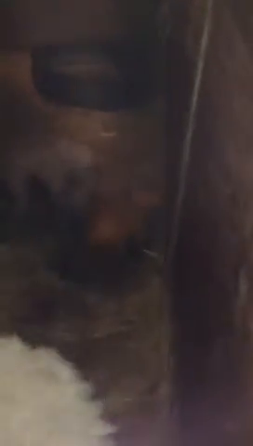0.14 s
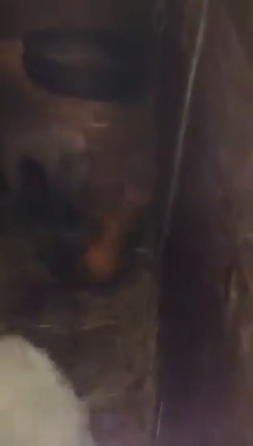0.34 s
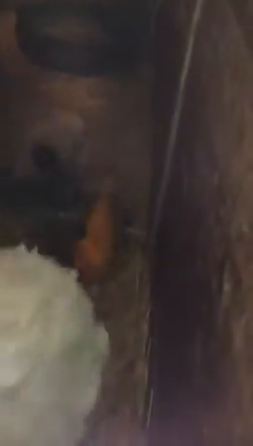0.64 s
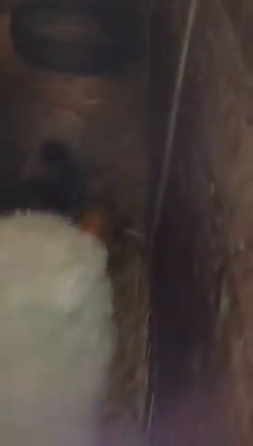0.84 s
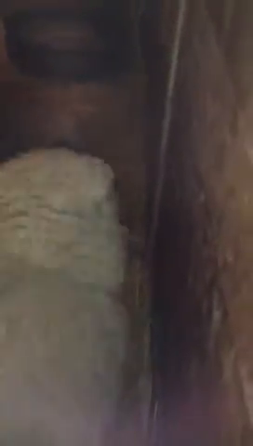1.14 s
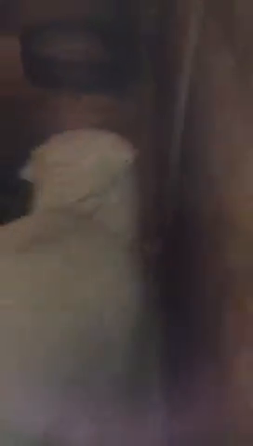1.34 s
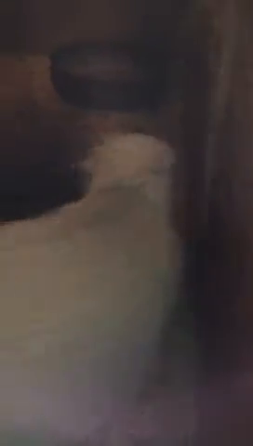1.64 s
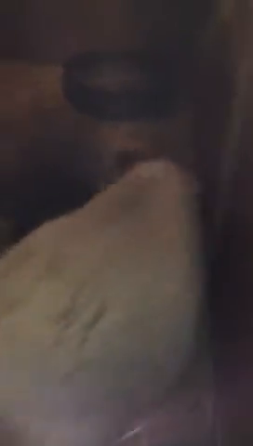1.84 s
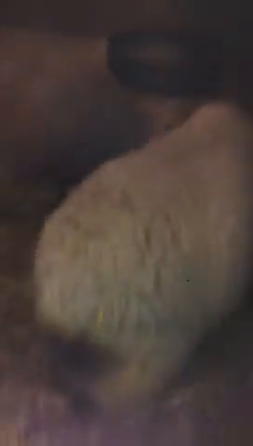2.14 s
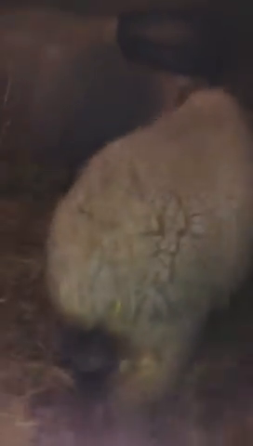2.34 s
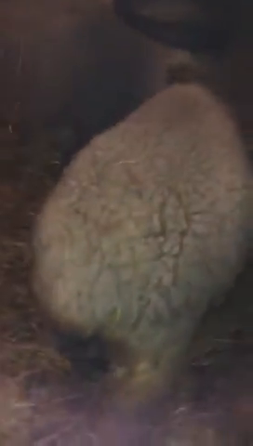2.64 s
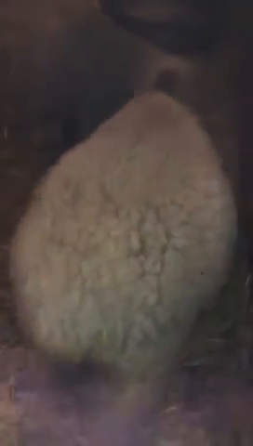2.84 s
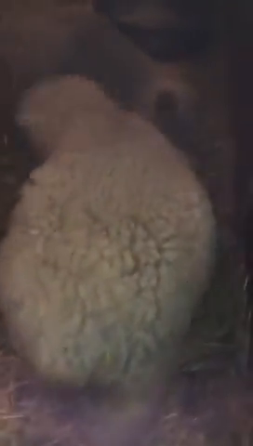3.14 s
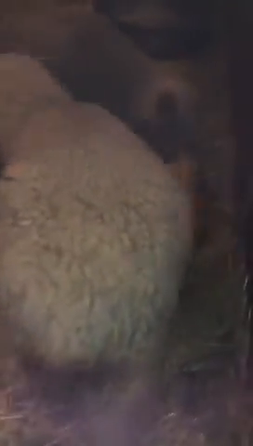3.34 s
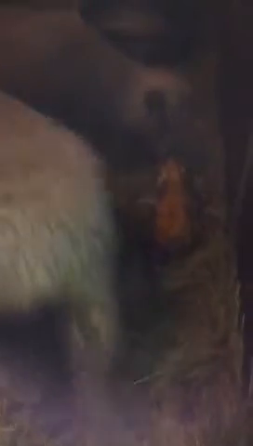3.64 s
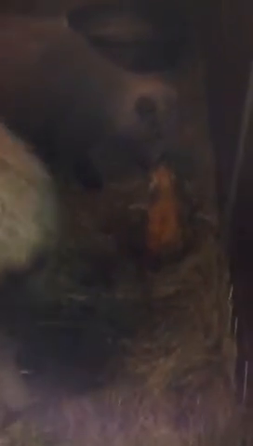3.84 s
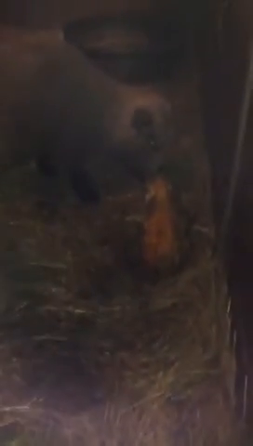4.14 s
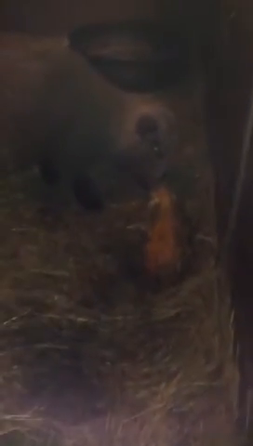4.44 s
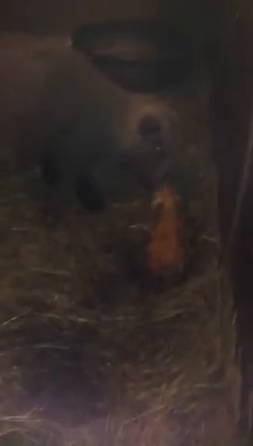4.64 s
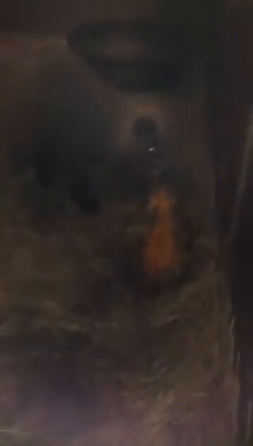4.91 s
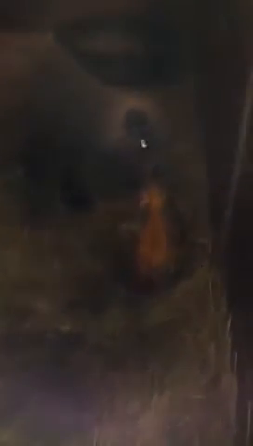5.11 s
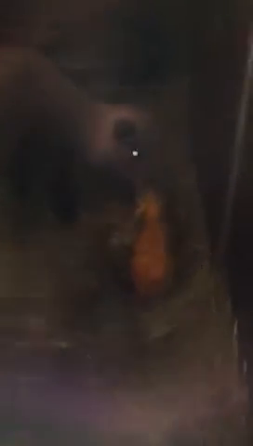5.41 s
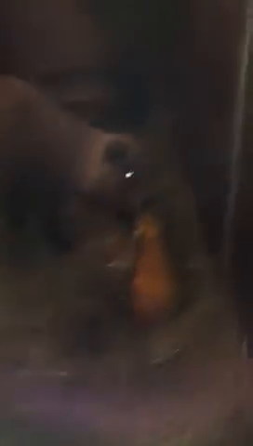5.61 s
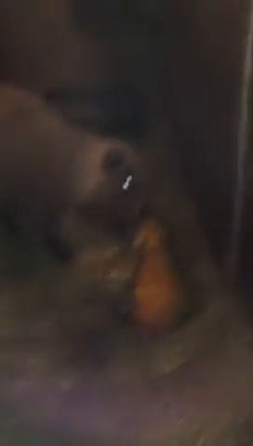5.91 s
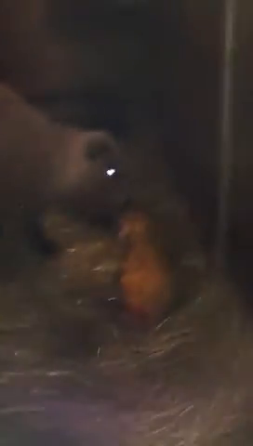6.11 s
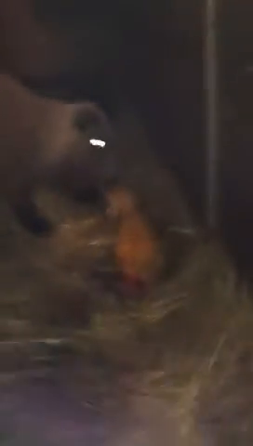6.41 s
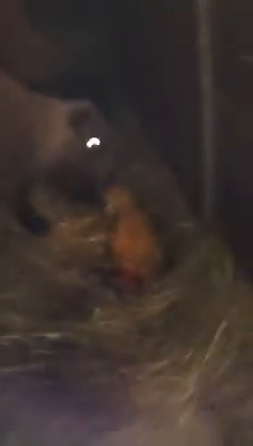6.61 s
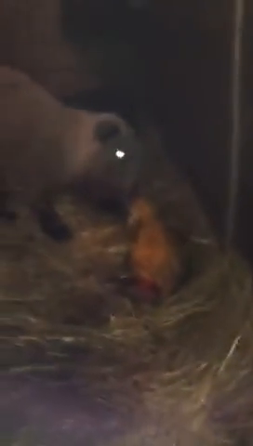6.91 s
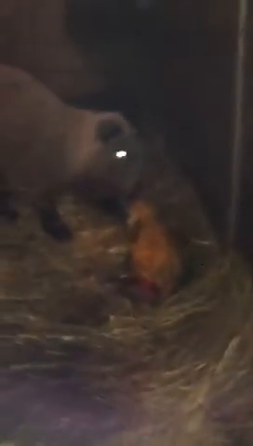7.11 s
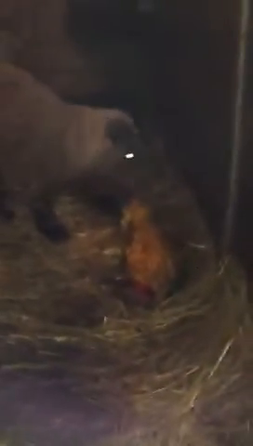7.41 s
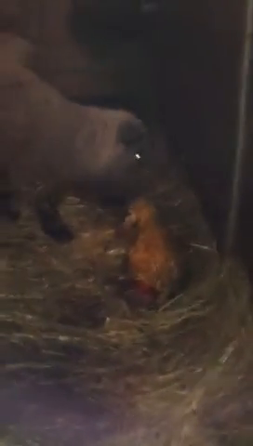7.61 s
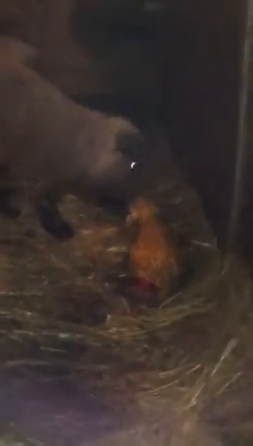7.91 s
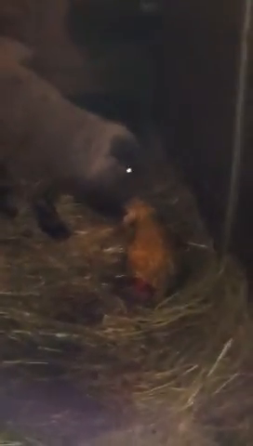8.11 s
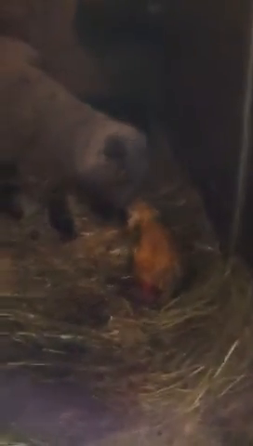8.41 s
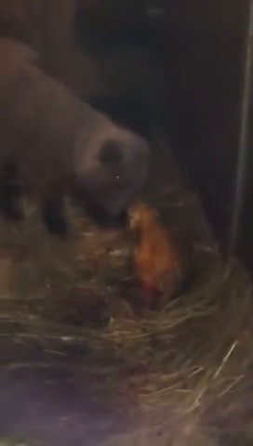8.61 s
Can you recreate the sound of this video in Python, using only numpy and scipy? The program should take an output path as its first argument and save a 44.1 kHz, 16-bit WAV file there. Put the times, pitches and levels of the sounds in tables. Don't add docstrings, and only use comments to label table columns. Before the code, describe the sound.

Close up in a wooden lambing pen, a newborn lamb repeats thin, bright, throbbing bleats about once a second. A hoarse young sheep farther off gives two longer calls that break upward. Late on, a ewe hums, opens into one low round bleat, then rumbles with closed mouth. Straw rustles, hooves shuffle and one knocks a board; a small microphone adds faint hiss.

```python
import sys
import numpy as np
from scipy import signal
from scipy.fft import rfft, irfft
from scipy.io import wavfile
from scipy.ndimage import uniform_filter1d, map_coordinates

SR = 44100
rng = np.random.default_rng(int(sys.argv[2]) if len(sys.argv) > 2 else 0)


def volts_from_db(level):
    exponent = np.asarray(level, float) / 20
    return 10 ** exponent


def transcribe(signal):
    frames = np.atleast_2d(signal).T
    limited = np.clip(frames, -1, 1)
    pcm = np.round(limited * 32767).astype(np.int16)
    wavfile.write(sys.argv[1], SR, pcm)


N = 385875


def unit(x):
    return x / np.sqrt(np.mean(x ** 2) + 1e-20)


def along(points, hz):
    f, v = np.transpose(points)
    return np.interp(np.log(hz + 1), np.log(f + 1), v)


def curves(rows):
    s, *cols = np.transpose(rows)
    return [np.interp(np.arange(N) / SR, s, c) for c in cols]


def calls(tables):
    def hush(row, gap_s):
        return (row[0] + gap_s,) + (-120,) * (len(row) - 1)

    rows = []
    for call in tables:
        rows += [hush(call[0], -.03), *call, hush(call[-1], .06)]
    return curves(rows)


def wobble(rate):
    coarse = np.arange(0, N + 32, 32)
    knots = rng.standard_normal(int(N * rate / SR) + 4)
    return np.interp(np.arange(N), coarse, map_coordinates(knots, [coarse * rate / SR]))


def colour(x, spectrum, lo_hz=1, hi_hz=3e4):
    hz = np.fft.rfftfreq(8192, 1 / SR) + 1e-3
    edges = np.sqrt((1 + (lo_hz / hz) ** 10) * (1 + (hz / hi_hz) ** 10))
    cepstrum = irfft(np.log(volts_from_db(along(spectrum, hz)) / edges + 1e-6))
    half = len(cepstrum) // 2
    cepstrum[1:half] *= 2
    cepstrum[half + 1:] = 0
    response = irfft(np.exp(rfft(cepstrum)))[:4096]
    return unit(signal.oaconvolve(x, response)[:N])


def shelve(x, hz, below_db, above_db):
    low = irfft(rfft(x) / (1 + (np.fft.rfftfreq(N, 1 / SR) / hz) ** 16), N)
    return volts_from_db(below_db) * low + volts_from_db(above_db) * (x - low)


def stirs(rows, bed_db):
    t = np.arange(0, N + 64, 64) / SR
    s, db, half_s = np.transpose(rows)[:, :, None]
    rise_over_fall = np.where(t < s, 0.85, 1)
    late = (t - s) / np.abs(half_s) / rise_over_fall
    gain = volts_from_db(bed_db) + (volts_from_db(db) * np.exp(-late ** 2)).sum(0)
    return np.interp(np.arange(N) / SR, t, gain)


def quaver(crest_s, rate_hz, depth_db):
    return -depth_db * np.sin(np.pi * rate_hz * (np.arange(N) / SR - crest_s)) ** 2


def flutter(rate_hz, depth_db):
    beat = np.cos(2 * np.pi * np.cumsum(rate_hz * (1 + 0.2086 * wobble(14))) / SR)
    return volts_from_db(depth_db * beat * (1.74 + 0.067 * wobble(14.0)))


def folds(pitch_hz, jitter, scatter_db):
    phase = np.cumsum(pitch_hz) / SR
    cycles = np.arange(1, int(phase[-1]) - 1)
    chance = rng.standard_normal((len(cycles), 2))
    at = np.interp(cycles + np.clip(jitter * chance[:, 0], -.4, .4), phase, np.arange(N))
    taps = np.floor(at)[:, None] + np.arange(-7, 9)
    away = taps - at[:, None]
    shape = np.sinc(away) * np.cos(np.pi * away / 16) ** 2
    size = volts_from_db(scatter_db * chance[:, 1])[:, None]
    pulses = np.bincount(np.clip(taps, 0, N - 1).astype(int).ravel(), (shape * size).ravel(), N)
    air = rng.standard_normal(N) * (1.4 + np.cos(2 * np.pi * phase))
    return unit(pulses), unit(air)


# (frequency [Hz], density [dB per Hz])
HISS_COLOUR = [(15, -69), (25, -39), (50, -18.5), (213, 1), (440, -6), (517, -9), (1510, -12.5),
               (6770, -12.5), (9850, -25.5), (11900, -15.5), (15100, -22)]


def microphone(dry):
    decay = np.exp(-1 / (.35 * SR))
    loud_db = 10 * np.log10(signal.lfilter([1 - decay], [1, -decay], dry ** 2) + 1e-9)
    heard = signal.lfilter(*signal.butter(2, 110, "high", fs=SR), dry)
    quick_db = 10 * np.log10(np.abs(uniform_filter1d(heard ** 2, SR // 25)) + 1e-9)
    hiss_db = -64 - 0.093 * np.maximum(loud_db + 70, 0) - 0.089 * np.maximum(quick_db + 28, 0)
    return heard + volts_from_db(hiss_db) * colour(rng.standard_normal(N), HISS_COLOUR)


# (frequency [Hz], t60 [s])
WALL_DECAY = [(200, 0.58), (1500, 0.71), (6000, 0.34), (12000, 0.032)]


def pen(x, delay_s):
    hz, t, z = signal.stft(rng.standard_normal(SR // 2), SR, nperseg=256)
    fade = volts_from_db(-60 * t / along(WALL_DECAY, hz)[:, None])
    tail = signal.istft(z * fade, SR, nperseg=256)[1]
    return signal.fftconvolve(np.pad(x, (int(delay_s * SR), 0)), tail / np.linalg.norm(tail))[:N]


def boards(x, flatten, t60):
    t = np.arange(4096) / SR
    spray = rng.standard_normal((2, len(t))) * volts_from_db(-60 * t / t60)
    spray /= np.linalg.norm(spray, axis=1, keepdims=True)
    spray[:, 0] = 0.39
    smear = rfft(spray)
    smear = irfft(smear / np.abs(smear) ** flatten)[:, :2048]
    smear /= np.linalg.norm(smear, axis=1, keepdims=True)
    paths = signal.oaconvolve(x[None], smear, axes=1)[:, :N]
    turn = np.pi / 4 + 0.73 * wobble(9)
    out = np.cos(turn) * paths[0] + np.sin(turn) * paths[1]

    def power(v):
        return np.abs(uniform_filter1d(v ** 2, 1500)) + 1e-9

    return out * (power(x) / power(out)) ** .4


# (time [s], level [dB], half length [s])
STRAW_RUSTLES = [(.13, -68, .035), (.48, -77, 0.092), (.72, -77, 0.045), (.8, -70, 0.037),
                 (.88, -73, 0.027), (1.19, -65, 0.063), (1.35, -76, 0.1), (1.59, -84, .04),
                 (1.79, -76, 0.12), (2.32, -70, 0.072), (2.6, -90, 0.16), (2.95, -81, 0.053),
                 (3.45, -68, 0.061), (3.66, -68, 0.08), (3.87, -76, 0.057), (4.065, -68, 0.05),
                 (4.21, -66.5, 0.055), (4.83, -61, 0.063), (4.97, -71, 0.084), (5.12, -68, 0.06),
                 (5.24, -74.5, 0.083), (6.26, -65, 0.039), (6.364, -69, 0.035), (6.53, -70, 0.069),
                 (6.656, -73, 0.032), (8.63, -73, 0.056), (8.73, -69.5, 0.1)]
# (time [s], level [dB], half length [s])
HOOF_SHUFFLES = [(.15, -75, 0.17), (.42, -68, 0.14), (.784, -63, 0.041), (1.35, -95, .12),
                 (1.63, -81, 0.022), (1.752, -81, 0.03), (3.674, -74, .05), (3.82, -76, 0.041),
                 (4.27, -74, 0.024), (4.87, -66, 0.13), (5.08, -63.5, 0.086), (5.2, -60, 0.0079),
                 (6.81, -56, 0.055), (8.19, -70, 0.055), (8.39, -95.5, 0.014)]
# (frequency [Hz], density [dB per Hz])
RUSTLE_COLOUR = [(710, -52), (1200, -18), (1830, -15), (2080, -11), (3720, -9.5), (6790, -3.5), (9930, -12),
                 (15000, -9.5)]
# (frequency [Hz], density [dB per Hz])
SHUFFLE_COLOUR = [(35, -25), (60, -3.5), (174, -5), (268, -7.5), (346, -1.5), (532, -5), (1500, -12),
                  (1950, -18), (3300, -120)]
# (time [s], peak [dB], centre [Hz])
STRAW_SNAPS = [(0.45, -53.5, 1844), (0.523, -52.5, 6310), (0.712, -53, 1600), (0.887, -52, 1390),
               (1.334, -51, 6670), (1.501, -54, 6290), (1.58, -65, 2560), (1.709, -51, 3580),
               (3.692, -48, 5990), (3.721, -49, 6870), (4.033, -45, 3630), (4.156, -51, 6950),
               (5.209, -58, 3132), (8.377, -65.5, 770.6), (8.602, -67, 692)]
# (time [s], peak [dB], centre [Hz])
SOFT_THUMPS = [
    (0.79, -55, 560),
    (0.888, -50, 279.4),
    (2.208, -56, 278),
    (3.811, -54, 476),
    (4.37, -52, 421),
    (7.965, -45, 441.3),
    (8.108, -44.5, 349),
]
# (frequency [Hz], level [dB], t60 [s])
BOARD_KNOCK = (6.3345, -24.5, [(1061, -8, .015), (1700, -1, .025), (2050, -1.5, 0.019), (3200, -11, .006)])


def straw():
    grains = rng.standard_normal(N) * volts_from_db(1.6 * wobble(250) + 0.5 * wobble(29))
    lumps = rng.standard_normal(N) * volts_from_db(2.1 * wobble(21))
    out = volts_from_db(10.0) * stirs(STRAW_RUSTLES, -87) * colour(grains, RUSTLE_COLOUR)
    out += volts_from_db(-1.0) * stirs(HOOF_SHUFFLES, -70.5) * colour(lumps, SHUFFLE_COLOUR)
    t = np.arange(SR // 40) / SR
    for s, db, hz in [*STRAW_SNAPS, *SOFT_THUMPS]:
        band = signal.butter(2, [hz / 1.5, min(hz * 1.5, 16000)], "band", fs=SR)
        crack = unit(signal.lfilter(*band, rng.standard_normal(len(t))))
        out[round(s * SR):][:len(t)] += volts_from_db(db - 5.5 - 60 * t / 0.051) * crack
    s, db, modes = BOARD_KNOCK
    ring = sum(volts_from_db(db + level - 60 * t / t60) * np.sin(2 * np.pi * hz * t) for hz, level, t60 in modes)
    out[round(s * SR):][:len(t)] += signal.lfilter(*signal.butter(2, 600, "high", fs=SR), ring)
    return out


# (time [s], pitch [Hz], effort [dB], mouth opening [dB])
EWE_BLEAT = [
    (6.775, 142.5, -59, -14),
    (6.92, 168.7, -38.5, -8.5),
    (6.945, 172.7, -42.5, -21.5),
    (7.0, 191.5, -43, 5),
    (7.14, 215, -41.5, 6),
    (7.32, 230.9, -43.5, 17),
    (7.42, 231.4, -43.5, 16),
    (7.665, 204.4, -43.5, 7.5),
    (7.72, 195.8, -56.5, 11),
]
# (frequency [Hz], level [dB])
EWE_RASP_COLOUR = [(240, -28.5), (450, -13.5), (716, -10.5), (959, -17.5), (1280, -17), (1720, -1.5),
                   (2010, -10.5), (2560, -4.5), (3000, -8.5), (3350, -16.5), (4110, -21.5), (4900, -21),
                   (6010, -20), (6900, -30), (10000, -45.5), (13000, -41)]
# (frequency [Hz], level [dB])
EWE_PALATE_COLOUR = [(1150, -36.5), (1560, -6), (1730, 5), (1900, -2), (2400, -37.5)]
# (time [s], level [dB], half length [s])
EWE_BREATH_PUMPS = [(7.01, -10.5, .03), (7.055, -2.5, 0.034), (7.125, 2, 0.019), (7.17, -10.5, 0.021),
                    (7.21, 4.5, 0.019), (7.242, -2, 0.029), (7.273, 3, 0.02), (7.318, 5.5, .024),
                    (7.365, -7, 0.01), (7.4, 7, 0.019), (7.45, -1.5, 0.028), (7.522, 0, 0.026),
                    (7.565, -1, .016), (7.608, -3.5, 0.013), (7.665, -1, .025), (7.72, 2.5, 0.021)]
# (time [s], effort [dB])
EWE_RUMBLE = [
    (8.43, -69),
    (8.47, -58.5),
    (8.6, -59),
    (8.655, -62),
    (8.694, -52),
    (8.75, -51),
]


def ewe():
    return ewe_bleat() + ewe_rumble()


def ewe_bleat():
    rate_hz, depth_db = 11.12, 6.2
    pitch_hz, _, mouth_db = curves(EWE_BLEAT)
    effort_db = calls([EWE_BLEAT])[1]
    pitch_hz = pitch_hz * (1 + .008 * wobble(24) + .008 * wobble(80))
    pitch_hz = pitch_hz * (1 + 0.0039 * (quaver(7.292, rate_hz, depth_db) + depth_db / 2))
    hum_db = effort_db - 25 * np.exp(-((np.arange(N) / SR - 7.05) / 0.028) ** 2)
    vowel_db = effort_db + mouth_db
    rasp_db = effort_db + np.minimum(mouth_db + 5.5, 14) + 0.35 * quaver(6.6, rate_hz, depth_db)

    pulses, air = folds(pitch_hz, jitter=.007, scatter_db=1.5)
    turns = 2 * np.pi * np.cumsum(pitch_hz) / SR
    octave = (0.38 + 1.0 * np.clip((162 - pitch_hz) / 35, 0, 1)) * volts_from_db(1.6 * wobble(50))
    hum = np.sqrt(2) * (np.sin(turns) + octave * np.sin(2 * turns))
    doubling = 1.17 * np.clip((170 - pitch_hz) / 18, 0, 1) * volts_from_db(3. * wobble(35))
    hum = hum + doubling * np.sin(3 * turns / 2)
    vowel = 1.57 * np.sin(3 * turns) + 0.4 * volts_from_db(3.1 * wobble(35)) * np.sin(4 * turns)
    vowel = vowel + 0.13 * colour(air, EWE_RASP_COLOUR, 463, 935)
    buzz = pulses + .33 * air
    rasp = colour(buzz, EWE_RASP_COLOUR, 1050, 11000)

    out = volts_from_db(vowel_db + 2.5 + 0.45 * wobble(45)) * stirs(EWE_BREATH_PUMPS, -15.5) * vowel
    out = out + boards(volts_from_db(rasp_db + 0.9 + wobble(40)) * rasp, flatten=0.8, t60=0.067)
    out = out + volts_from_db(rasp_db - 8.0 + 1.8 * wobble(30)) * colour(buzz, EWE_PALATE_COLOUR)
    return out + volts_from_db(hum_db + 1.4 * wobble(40)) * hum


def ewe_rumble():
    chest_db, = calls([EWE_RUMBLE])
    nose_db = chest_db + np.where(np.arange(N) / SR > 8.62, -6.5, -14)
    slow, puff = folds(58 * (1 + 0.25 * wobble(14)), jitter=0.13, scatter_db=2.5)
    chest = colour(slow + 0.4 * puff, [(60, -34), (130, -4.0), (200, 11.0), (290, -7), (600, -49.5)])
    nose = colour(slow + 1.8 * puff, [(250, -26), (450, -5), (650, -1.0), (1100, -19.0), (3000, -24.0)])
    return volts_from_db(chest_db + 3.0) * chest + volts_from_db(nose_db + .3) * nose


# (centre [Hz], width [Hz], depth [0-1])
NOSE_HOLLOWS = [(1860, 113, .9), (5610, 330, .99), (8050, 300, .99)]


def hollows(x):
    for hz, width_hz, depth in NOSE_HOLLOWS:
        x = x - np.clip(depth, 0, 1) * signal.lfilter(*signal.iirpeak(hz, hz / width_hz, SR), x)
    return x


def tongue(pulses, centre_hz):
    out = 0
    for hz in np.arange(1450, 2200, 150):
        peak = [(hz - 700, -30), (hz - 130, -7), (hz, 0), (hz + 130, -7), (hz + 700, -30)]
        out = out + np.clip(1 - np.abs(centre_hz - hz) / 150, 0, 1) * colour(pulses, peak)
    return out


# (time [s], pitch [Hz], effort [dB], mouth opening [dB])
YOUNG_CALLS = [
    [(0.0, 320.3, -49.5, 2), (0.12, 315, -67, -1.5), (0.2, 319.7, -71.5, -9), (0.35, 315, -73.5, 19)],
    [(2.06, 263, -73, -17), (2.14, 260.5, -56, 2), (2.2, 259, -42.5, 17), (2.48, 254.9, -34.5, 30.5),
     (2.62, 257.3, -39.5, 29.5), (2.9, 281.6, -41.5, 13), (2.96, 329.5, -41, 7), (3.26, 323.5, -45, 5.5),
     (3.44, 321, -59, 6.5), (3.64, 319.6, -83, -11)],
    [(5.77, 283, -77, -8), (5.86, 290, -52, 9), (5.92, 291.8, -46.5, 13.5), (6.02, 258.4, -40, 32),
     (6.25, 275.7, -31, 24), (6.36, 279.7, -36.5, 24), (6.42, 324.6, -38.5, 18), (6.72, 336, -40.5, 13.5),
     (6.98, 335.7, -45.5, 8)],
]
# (frequency [Hz], level [dB])
YOUNG_LOW_THROAT = [(260, -29), (450, -18), (790, -5), (1040, 2), (1300, -17), (1960, -9.5), (3400, -11),
                    (3950, -2.5), (4600, -15), (5340, -12), (6300, -16), (6900, -23), (8060, -25),
                    (10000, -48), (12000, -52), (15600, -55), (22000, -120)]
# (frequency [Hz], level [dB])
YOUNG_HIGH_THROAT = [(180, -18), (300, -27), (700, 8.5), (960, 10), (1280, -2.5), (2130, -6.5),
                     (3090, -7.5), (4010, -3.5), (5900, -13.5), (6880, -13), (9820, -32), (12000, -34),
                     (15600, -65), (22000, -120)]
# (first crest [s], rate [Hz], depth [dB])
YOUNG_QUAVERS = [
    (0.005, 12.5, 3.5),
    (2.97, 7.3, 12),
    (6.431, 9.26, 11.5),
]
# (time [s], share [0-1])
YOUNG_HOARSENESS = [(2.2, .28), (2.44, .22), (2.54, .06), (2.65, .04), (2.76, .18), (5.9, .3), (6.0, .24),
                    (6.3, .22)]
# (time [s], second resonance [Hz], its strength [dB], gain under 900 Hz [dB])
YOUNG_MOUTH = [(2.2, 2030, -12, 0.5), (2.42, 2060, -11, -3), (2.55, 1997, -22, -0.5),
               (2.75, 1620, -13, -0.5), (2.95, 1501, -15, 0), (3.4, 1501, -15, 2.5), (5.9, 2050, -14.5, 4),
               (6.05, 2050, -10, -3), (6.2, 1642, -13, -8), (6.33, 1700, -4.5, -6.5),
               (6.45, 1810, -11, 3.2), (6.7, 1640, -20, -1.8)]


def young_sheep():
    pitch_hz, _, mouth_db = curves(sum(YOUNG_CALLS, []))
    effort_db = calls(YOUNG_CALLS)[1]
    high = np.clip((pitch_hz - 292) / 26, 0, 1)
    clear, = curves(YOUNG_HOARSENESS)
    hoarse = clear + (.5 - clear) * np.clip((pitch_hz - 275) / 48, 0, 1)
    which = np.searchsorted([call[-1][0] + .1 for call in YOUNG_CALLS[:-1]], np.arange(N) / SR)
    pump_db = high * np.choose(which, [quaver(*row) for row in YOUNG_QUAVERS])
    voice_db = effort_db + pump_db
    first_db = voice_db - mouth_db
    rasp_db = -43 + np.minimum(effort_db + 38.5, 0) + 0.6 * pump_db
    drift = (.003 + .05 * hoarse) * wobble(24)
    shiver = (.002 + .12 * np.minimum(hoarse, .42)) * wobble(90)
    pitch_hz = pitch_hz * (1 + drift + shiver)
    pulses, air = folds(pitch_hz, jitter=.005, scatter_db=1.)

    def throat(x, *edges):
        low_register = (1 - high) * colour(x, YOUNG_LOW_THROAT, *edges)
        return low_register + high * colour(x, YOUNG_HIGH_THROAT, *edges)

    first = np.sqrt(2) * np.sin(2 * np.pi * np.cumsum(pitch_hz) / SR)
    low = throat(pulses + 1.7 * hoarse ** 2 * air, 470, 1250)
    rasp = throat(pulses + (.05 + 2.6 * np.minimum(hoarse, .27)) * air, 1250)
    centre_hz, strength_db, jaw_db = curves(YOUNG_MOUTH)
    rasp = rasp + volts_from_db(strength_db) * tongue(pulses + 4.5 * hoarse * air, centre_hz)
    vowel_db = voice_db - 5.0 + 0.83 * high + (1.5 + 2.1 * hoarse) * wobble(55)
    vowel = volts_from_db(vowel_db) * shelve(low, 900, jaw_db, 0)
    rasp = boards(volts_from_db(rasp_db + 6.0 + 0.7 * wobble(22)) * rasp, flatten=0.83, t60=0.041)
    return vowel + rasp + volts_from_db(first_db - 1.5 + 5.6 * wobble(55)) * first


# (time [s], peak [dB], pitch [Hz], mouth opening [dB], cheek resonance [dB])
LAMB_THROBS = [(0.01, -38, 370.5, -22, .3), (0.111, -49.5, 451, -1.5, 2),
               (0.93, -39, 415.5, -19.5, -2), (1.01, -36, 438, -13, 1.5), (1.12, -43, 384.4, 1, 1),
               (1.849, -40, 421, -21, -3), (1.922, -30, 448, -19, 0), (2.007, -23.5, 457.7, -11.5, -4),
               (2.106, -25, 445.5, -16, -1.2), (2.208, -31, 411.4, -11, -1.5),
               (3.069, -38, 430.2, -43, -11), (3.148, -31, 442, -13, 0.5),
               (3.244, -31, 429.2, -39, 0.5), (3.346, -33, 414.4, -13, .3), (3.411, -43, 402, -21, .3),
               (4.38, -44, 426, -16, 0), (4.48, -31, 441.3, -13, -3.5), (4.561, -30, 436.7, -10, -4),
               (4.653, -29.5, 441.6, -12.5, -2.5), (4.747, -31.5, 427.7, -11.5, 0),
               (5.381, -45.5, 409, -23, -1), (5.459, -35, 429, -15, 2.5),
                   (5.553, -36, 429.3, -10.5, -1), (5.64, -33.5, 440, -12.5, -1.5),
                   (5.725, -31, 453.6, -11, 0.5), (5.812, -28.5, 446.7, -9.5, -1.5),
                   (5.919, -33.5, 410.3, -5.5, -1), (6.0, -38.5, 397.7, -10, -1),
                   (6.079, -33.5, 421.8, -19, -6), (6.165, -30, 425.7, -13, -2.5), (6.8, -40, 417, -26, -1),
                   (6.871, -34, 433.7, -20, 5.5), (6.952, -31.5, 435.5, -18.5, .3),
                   (7.053, -36.5, 408.7, -8, -5), (7.684, -30.5, 437.8, -14, 2), (7.757, -29, 449, -18, 1),
                   (7.856, -29, 433, -22, 1.5), (7.94, -26.5, 448.3, -25, 0.8),
                   (8.027, -26.5, 442.2, -20, -0.7)]
# (frequency [Hz], level [dB])
LAMB_COLOUR = [(240, -46), (400, -16.5), (650, -27.5), (1050, -20), (1330, -5.5), (1650, -12),
               (1910, -16.5), (2620, -18.5), (2960, -18.5), (3500, 1.5), (4070, -10.5), (4810, 2.5),
               (5860, 5.5), (6510, -2), (8300, -8), (10100, -19), (15000, -35)]
# (start [s], under 1.2 kHz [dB], 1.9-2.8 kHz [dB], 2.9-4.9 kHz [dB], over 6.2 kHz
# [dB])
LAMB_HEAD = [
    (0.0, -2, 2, -3.5, 1.3),
    (.8, -0.5, 3, -0.5, 3),
    (1.7, -1, 1.5, 2.5, 1.5),
    (3.0, 0, 2, -1.5, 2.5),
    (4.25, 0.5, 3, 3.5, 2.6),
    (5.25, -3.5, -14, 1.5, 0),
    (6.7, 12, -12, 0, 0),
    (7.6, 8, 13, 1, -0.5),
]
# (time [s], level [dB], half length [s])
LAMB_LEAKS = [
    (.89, -52, 0.019),
    (.93, -47, 0.031),
    (1.835, -43.5, 0.032),
    (3.06, -54, 0.035),
    (4.365, -56, .03),
    (5.34, -55, .02),
    (5.385, -54, 0.039),
    (6.79, -45, .03),
    (7.675, -34, .03),
]


def lamb():
    t = np.arange(N) / SR
    tone, breath, arch = np.zeros(N), np.zeros(N), np.zeros(N)
    throbs = LAMB_THROBS
    last = np.diff([row[0] for row in throbs], append=99) > .2
    for (s, db, *_), ending, opening in zip(throbs, last, np.roll(last, 1)):
        near = slice(max(0, int((s - .15) * SR)), int((s + .3) * SR))
        late = (t[near] - s) / np.where(t[near] < s, .032, .029)
        rise = np.exp(-.9 * np.abs(late) ** (4 if opening else 2.4))
        swell = np.where(late < 0, rise, np.exp(-.8 * late ** 2))
        tone[near] += volts_from_db(db) * swell
        arch[near] += swell
        breath[near] += volts_from_db(db - (8 if ending else 19)) * np.exp(-.6 * (late - .6 - .4 * ending) ** 2)
    peak_db, pitch_hz, mouth_db, ring_db = curves(throbs)
    pitch_hz = pitch_hz * (1 + .019 * (np.minimum(arch, 1) - 1) + 0.00496 * wobble(60))
    pulses, air = folds(pitch_hz, jitter=.0028, scatter_db=.45)
    start_s, *pose = np.transpose(LAMB_HEAD)
    call = np.maximum(np.searchsorted(start_s, t) - 1, 0)
    chin_db, tongue_db, cheek_db, top_db = np.array(pose)[:, call]

    bloom_db = 4.8 * (np.minimum(np.roll(arch, int(0.049 * SR)), 1) - .7)
    upper = shelve(colour(pulses, LAMB_COLOUR, lo_hz=3950), 4860, cheek_db, 0)
    upper = shelve(upper, 6250, 0, top_db + bloom_db)
    upper = volts_from_db(0.62 * wobble(50)) * flutter(41, 0.94) * upper
    middle_db = -6.5 + ring_db + cheek_db + 0.11 * (mouth_db + 25.0) + 0.063 * (peak_db + 33.5)
    middle = volts_from_db(middle_db + 1.8 * wobble(50)) * flutter(38, 1.88) * colour(pulses, LAMB_COLOUR, 2890, 4210)
    bright = tone * (upper + middle) + breath * colour(air, LAMB_COLOUR, lo_hz=3132)
    bright = bright + stirs(LAMB_LEAKS, -120) * colour(air, LAMB_COLOUR, lo_hz=4600)

    mouth = shelve(colour(pulses, LAMB_COLOUR, lo_hz=336.1, hi_hz=2750), 1200, chin_db, 0)
    mouth = shelve(mouth, 1926, 0, tongue_db)
    opening_gain = volts_from_db(mouth_db - 6.5 + 1.2 * wobble(40)) * np.minimum(arch, 1) ** 0.93
    mouth = opening_gain * tone * flutter(36, 2.2) * mouth
    return mouth + boards(volts_from_db(-.7) * bright, flatten=.4, t60=.03)


def scene():
    bedding, mother, young, little = straw(), ewe(), young_sheep(), lamb()
    young = hollows(young + volts_from_db(-6) * pen(young, .004))
    walls = volts_from_db(-13.5) * pen(little + volts_from_db(-8) * mother, .006)
    return (little + young + mother + walls + bedding)[None]


def top_cut(x):
    return signal.sosfilt(signal.butter(12, 15270, fs=SR, output="sos"), x)


def record(dry):
    mix = microphone(dry)
    return top_cut(mix)


dry = scene()
out = record(dry)
transcribe(out)
```